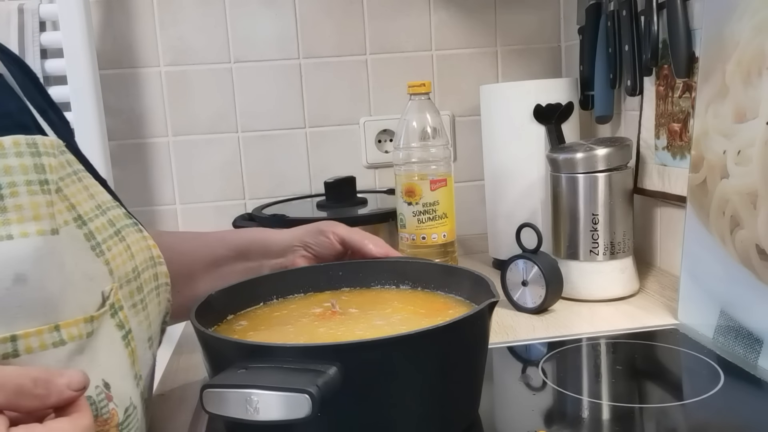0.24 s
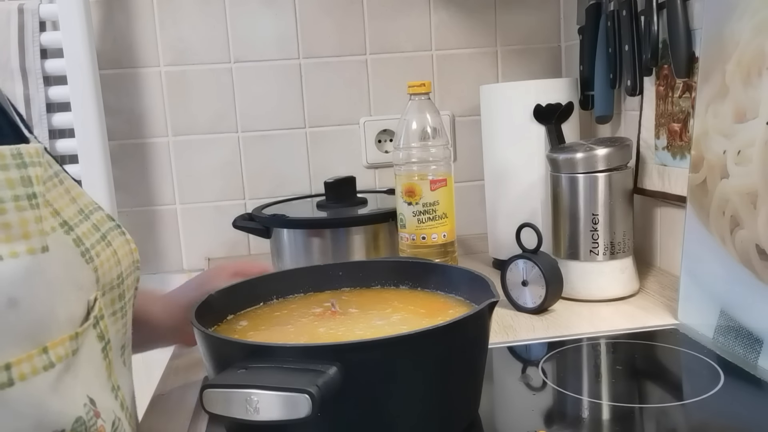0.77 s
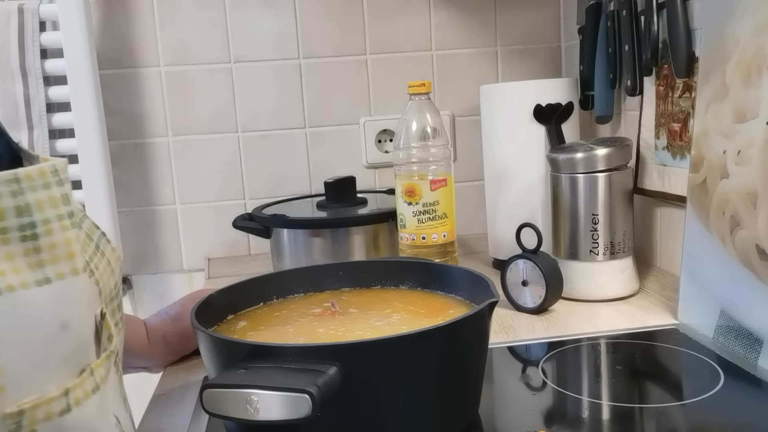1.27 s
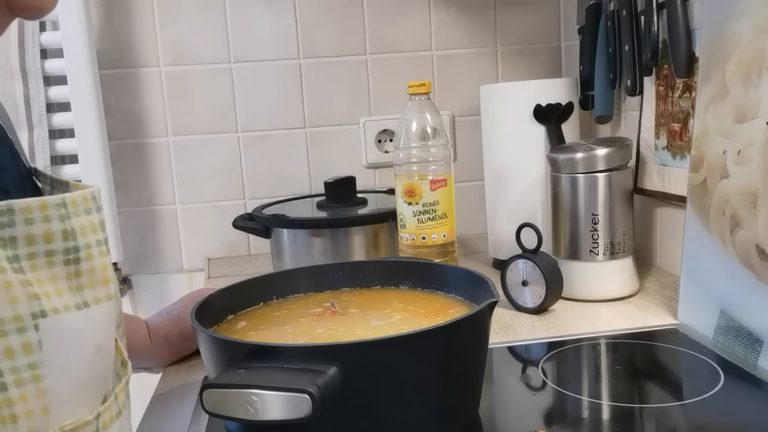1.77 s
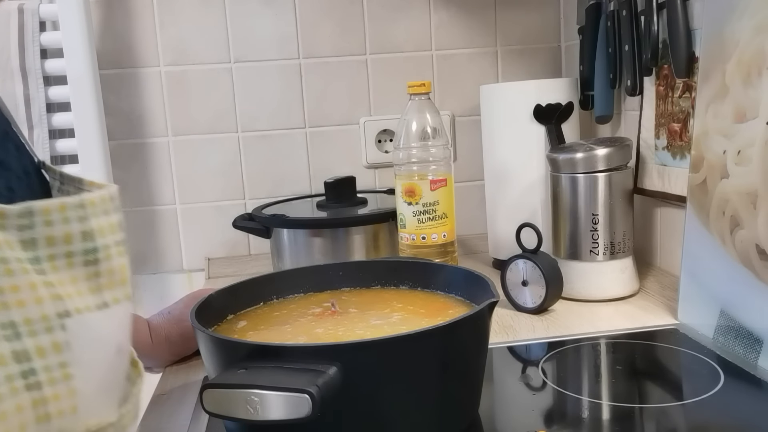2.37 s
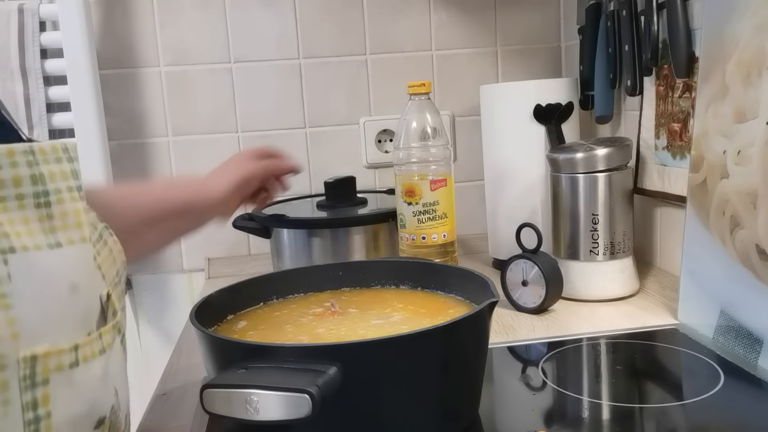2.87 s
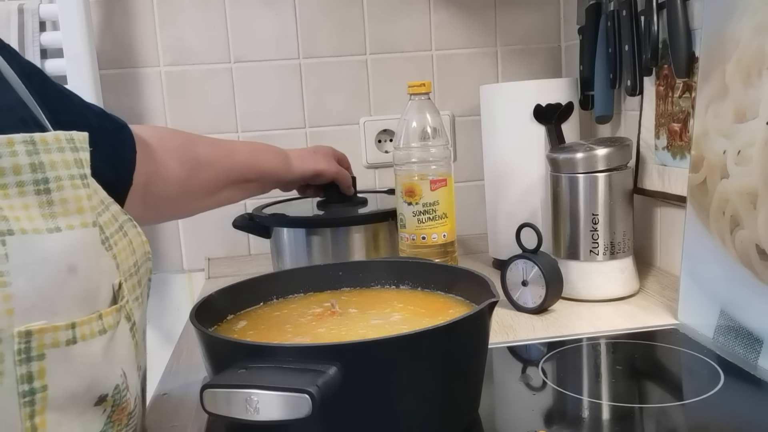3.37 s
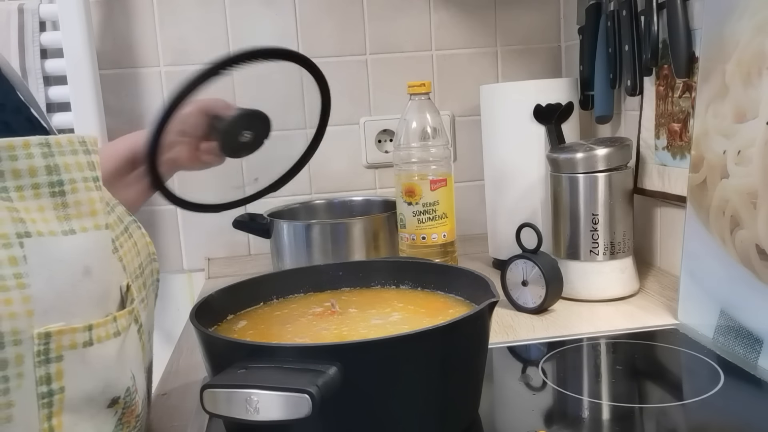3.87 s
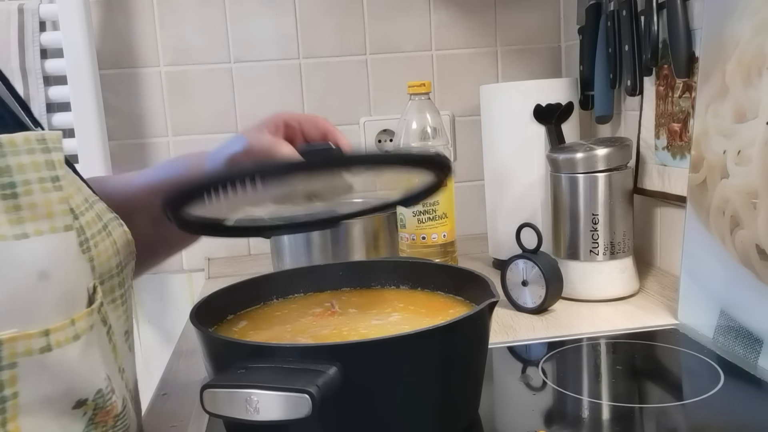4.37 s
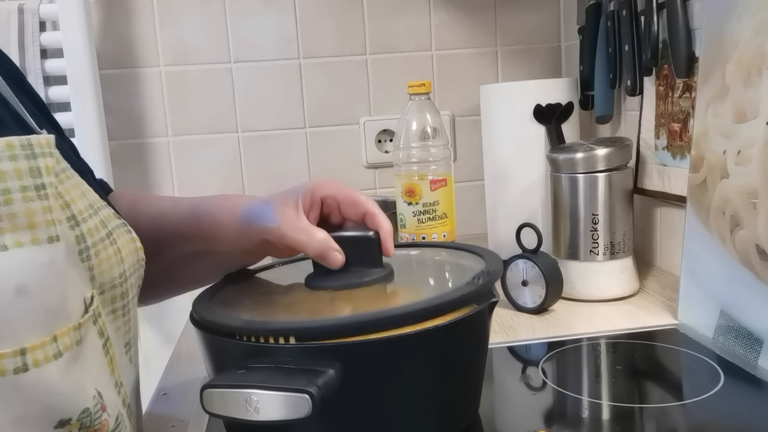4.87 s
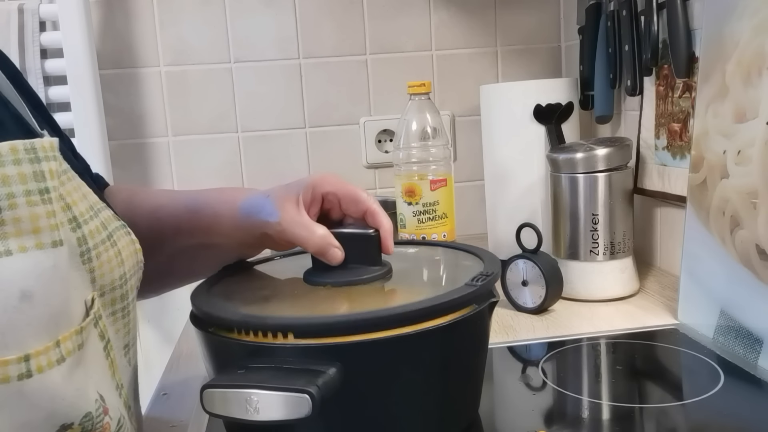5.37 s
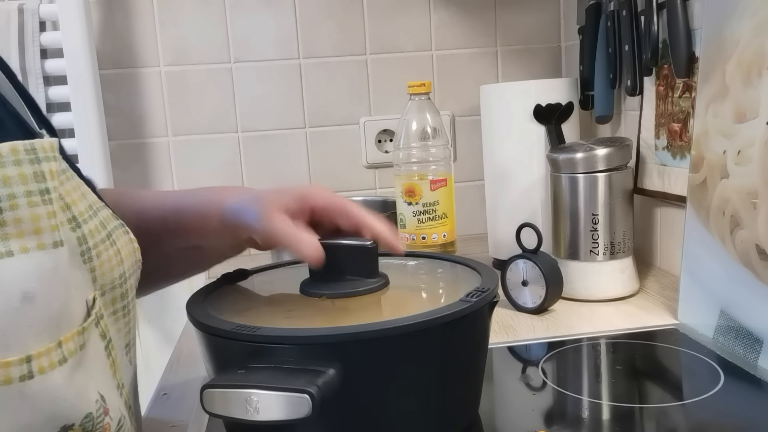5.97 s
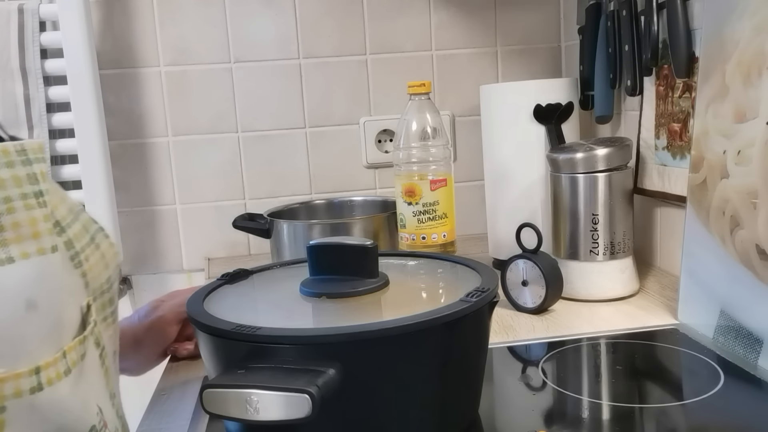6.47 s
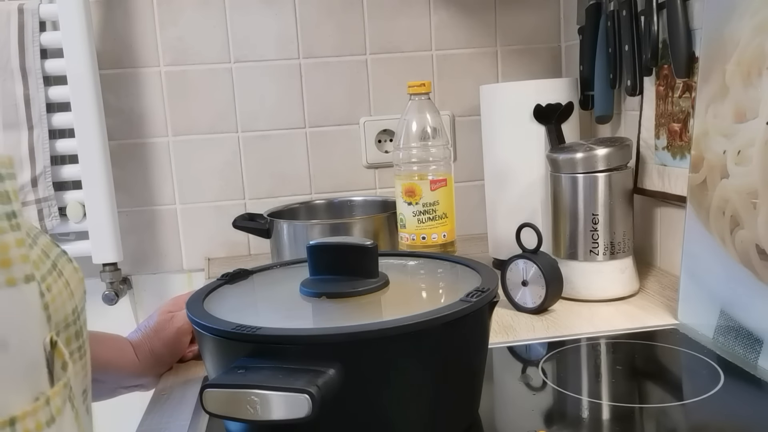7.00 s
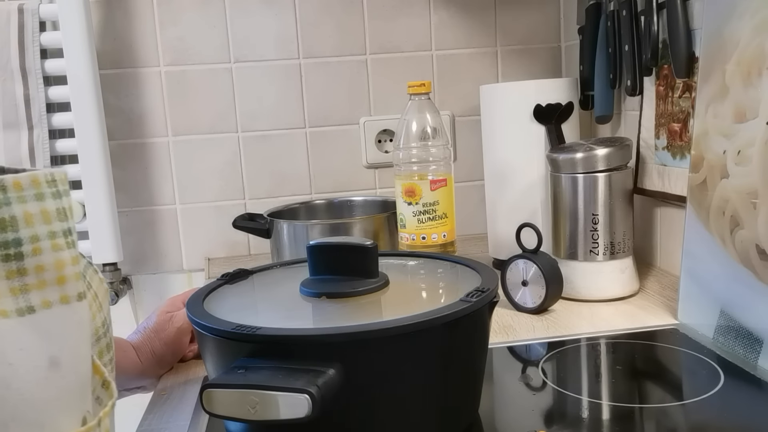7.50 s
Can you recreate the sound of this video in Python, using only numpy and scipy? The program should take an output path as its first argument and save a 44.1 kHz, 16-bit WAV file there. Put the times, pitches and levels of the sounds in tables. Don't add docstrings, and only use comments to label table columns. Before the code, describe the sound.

Quick, bright clockwork ticking in a tiled kitchen, with a short juddering lid scrape, then soft low knocks and a dull thump as a pot closes.

```python
import sys
import numpy as np
from scipy import signal
from scipy.fft import rfft, irfft
from scipy.io import wavfile
from scipy.ndimage import uniform_filter1d

SR = 44100
rng = np.random.default_rng(int(sys.argv[2]) if len(sys.argv) > 2 else 0)


def attenuation_scalar(level_db):
    decades = np.asarray(level_db, float) / 20
    return 10 ** decades


def file_out(sig):
    cols = np.atleast_2d(sig).T
    lim = np.clip(cols, -1, 1)
    pcm = np.round(lim * 32767).astype(np.int16)
    wavfile.write(sys.argv[1], SR, pcm)


N = 341334

# (middle [s], half length [s], level [dB])
SWELLS = [(0.035, 0.16, -54.5), (0.242, 0.062, -48), (1.05, 0.17, -52), (1.298, 0.054, -51.5),
          (1.727, 0.066, -48.5), (2, 0.16, -52), (2.288, 0.032, -50), (2.477, 0.023, -48.5),
          (2.747, 0.2, -58), (3.296, 0.024, -48), (3.543, 0.15, -50.5), (3.76, 0.044, -50),
          (4.008, 0.071, -49), (4.407, 0.16, -50.5), (4.595, 0.038, -56), (5.022, 0.05, -50.5),
          (5.31, 0.063, -48.5), (5.718, 0.087, -39.5), (6.325, 0.18, -56.5), (6.563, 0.1, -51.5),
          (6.96, 0.052, -47), (7.306, 0.11, -54), (7.54, 0.024, -48), (7.7, 0.046, -52)]
STILL_DB = -56


def evened(x):
    return x / np.sqrt(np.mean(x ** 2) + 1e-20)


def read(points, hz):
    f, value = np.transpose(points)
    return np.interp(np.log(hz + 1), np.log(f + 1), value)


def add(mix, s, sound):
    part = mix[..., round(s * SR):][..., :sound.shape[-1]]
    part += sound[..., :part.shape[-1]]


def resonate(x, hz, width):
    r = np.exp(-np.pi * width / SR)
    if np.isscalar(hz):
        return 2 * signal.lfilter([1 - r], [1, -r * np.exp(2j * np.pi * hz / SR)], x + 0j).real
    turn = np.exp(2j * np.pi * np.cumsum(hz) / SR)
    return 2 * (turn * signal.lfilter([1 - r], [1, -r], x / turn)).real


def resonate_twice(x, hz, width):
    return resonate(resonate(x, hz, width), hz, width)


def humps(t, rest_db, events):
    power = attenuation_scalar(rest_db) ** 2
    power = power + sum(attenuation_scalar(db) ** 2 * np.exp(-((t - s) / half) ** 2) for s, half, db in events)
    return 10 * np.log10(power)


def shape(points, hz, lo_hz, hi_hz):
    gain = attenuation_scalar(read(points, hz))
    inside = (hz > lo_hz) * (hz < hi_hz)
    return gain / np.sqrt(np.sum(gain ** 2 * inside) / len(hz))


def field(gain, size, patchy_db):
    # (pitch [Hz], likeness [-1 to 1])
    likeness = [(60, 0.82), (130, 1), (290, 0.51), (640, 0.45), (1410, -0.047), (7500, 0.044),
                (9000, 0.0037), (11000, 0.07)]
    # (pitch [Hz], left minus right [dB])
    balance = [(60, -2), (130, -3.5), (290, -2), (640, 2.5), (1410, 1), (3100, 2.5), (6820, 2.5),
               (15000, 9)]
    frames, hz = 4 * N // size + 5, np.fft.rfftfreq(size, 1 / SR)[:, None]
    a, b, c, d, patches = rng.standard_normal((frames, len(hz), 5)).T
    patches = uniform_filter1d(patches, size=5, axis=0)
    patches = evened(uniform_filter1d(patches, size=9, axis=1))
    same = np.clip(read(likeness, hz), -1, 1)
    left = a + 1j * b
    right = same * left + np.sqrt(1 - same ** 2) * (c + 1j * d)
    z = np.array([left, right])
    z *= attenuation_scalar(np.array([.5, -.5])[:, None, None] * read(balance, hz) + patchy_db * patches)
    z *= gain(hz, np.arange(frames) * size / 4 / SR) / np.sqrt(size)
    return signal.istft(z, nperseg=size, noverlap=3 * size // 4)[1][:, :N]


def room():
    # (pitch [Hz], level [dB per Hz])
    room_tone = [(15, -37), (25, -17), (48, -8.5), (71, -21), (108, 3.5), (140, -4), (185, -4.5),
                 (209, -15), (276, -16), (377, -31.5), (405, -25), (647, -28), (885, -32), (1130, -45),
                 (1600, -41), (2080, -70), (3520, -120)]
    # (middle [s], half length [s], level [dB])
    wafts = [
        (0.07, 0.04, -68.5),
        (1.065, 0.044, -62.5),
        (1.878, 0.049, -61.5),
        (2.187, 0.092, -67),
        (2.8, 0.21, -72),
        (4.53, 0.25, -69.5),
        (5.506, 0.24, -70),
    ]

    def gain(hz, t):
        stir_db = humps(t, STILL_DB, SWELLS)
        deep = 1 / (1 + (hz / 72) ** 12)
        high = 1 / (1 + (260 / (hz + 1)) ** 6)
        drone = shape(room_tone, hz, 35, 70) * attenuation_scalar(-69.5)
        rumble = shape(room_tone, hz, 80, 210) * attenuation_scalar(stir_db - 2.5)
        air_db = humps(t, -69, wafts) + 0.13 * (stir_db - STILL_DB) + 2.0
        air = shape(room_tone, hz, 300, 1000) * attenuation_scalar(air_db)
        return deep * drone + (1 - deep) * ((1 - high) * rumble + high * air)
    return field(gain, size=2048, patchy_db=3.5)


def boom():
    ring = resonate_twice(rng.standard_normal(N), 104.1, 21.2)
    steadier = np.sqrt(uniform_filter1d(ring ** 2, size=2600) + 0.66 * np.mean(ring ** 2))
    ring = evened(ring / steadier)
    return ring * attenuation_scalar(humps(np.arange(N) / SR, STILL_DB, SWELLS) - 4 + np.array([[-.7], [.7]]))


def hum():
    # (pitch [Hz], width [Hz], level
    # [dB])
    hum_tones = [(50, 10, -59), (277.4, 30.7, -74.5), (401.9, 11, -84.5), (696, 7.2, -84.5),
                 (881.3, 61, -80.5), (178, 16.7, -69.5), (600, 30, -85.5)]
    t, noise = np.arange(N) / SR, rng.standard_normal((len(hum_tones), N))
    tones = [evened(resonate_twice(n, hz, width)) for n, (hz, width, _) in zip(noise, hum_tones)]
    tones[0] = 0.51 * tones[0] + np.sin(2 * np.pi * hum_tones[0][0] * t)
    tones[0] = tones[0] * attenuation_scalar(-5.0 * np.exp(-((t - 2.7) / 0.61) ** 2))
    tones[1] = tones[1] * attenuation_scalar(np.interp(t, [5.8, 6.9], [0, 6.0]))
    return sum(attenuation_scalar(db) * tone for tone, (*_, db) in zip(tones, hum_tones))


def whine():
    # (pitch [Hz], level [dB])
    lines = [(8775, -93), (8976, -92), (9076, -85), (9125, -87), (9717, -92)]
    noise = rng.standard_normal((len(lines), 2, N))
    width_hz = 3.2
    return sum(attenuation_scalar(db - 4.5) * evened(resonate_twice(n, hz, width_hz)) for n, (hz, db) in zip(noise, lines))


def groans():
    # (middle [s], half length [s], level [dB], pitch [Hz])
    moves = [(0.751, 0.15, -67, 227), (1.11, 0.035, -65, 178), (1.503, 0.086, -66, 232),
             (1.95, .08, -62, 182.6), (2.15, 0.047, -61, 179), (2.397, 0.23, -77.5, 429),
             (2.75, 0.098, -68, 175), (3.99, 0.037, -59.5, 177.6), (4.47, 0.083, -61.5, 180),
             (5.151, 0.058, -64, 283), (5.55, 0.024, -47, 182.6), (6.032, 0.11, -66, 280),
             (6.903, 0.061, -65, 294), (7.097, 0.091, -69.5, 306), (7.4, 0.17, -60, 179),
             (7.402, 0.12, -68, 252), (7.652, 0.073, -66, 296), (0.049, 0.06, -72, 608),
             (3.472, 0.014, -55.5, 526), (3.516, 0.013, -58, 430), (3.548, 0.018, -60, 418),
             (3.596, 0.0083, -69, 872), (1.855, 0.032, -63.5, 412), (7.315, 0.045, -85, 1320)]
    out, u = np.zeros((2, N)), np.arange(-12000, 12000) / SR
    for (s, half, db, hz), noise in zip(moves, rng.standard_normal((len(moves), 2, len(u)))):
        tone = evened(resonate_twice(noise[0] + 0.42 * noise, hz, 0.15 * hz))
        swell = attenuation_scalar(db) * tone * np.exp(-.5 * (u / half) ** 2)
        add(out, max(s + u[0], 0), swell[:, u >= -s])
    return out


def beats():
    # (time [s], click [dB], body ring [dB], bright ring [dB])
    ticks = [(0.091, -56.5, -13, -1), (0.516, -53.5, -20, -8), (0.943, -55.5, -14, -4.5),
             (1.368, -57, -16, 1), (1.7947, -53, -6.5, -10), (2.224, -51, -11, -8.5),
             (2.6506, -54.5, -8.5, -7), (3.079, -54, -6.5, -2.5), (3.51, -53.5, -8, 4),
             (3.9396, -55, -8.5, -3.5), (4.37, -56, -4, -6), (4.804, -55.5, -6, -3), (5.233, -54, -5.5, -5),
             (5.664, -52.5, -6, -0.5), (6.096, -56.5, -11, -5), (6.526, -53.5, -13, -4.5),
             (6.957, -47, -24, -2.5), (7.3874, -55, -3.5, -2)]
    # (time [s], click [dB], body ring [dB], bright ring [dB])
    tocks = [(0.295, -53, -24, -9), (0.721, -57, -17, -0.5), (1.147, -48, -23, -13), (1.5746, -51, -24, -4),
             (2, -51, -20, -9), (2.428, -51, -23, -9), (2.857, -49, -23, -11), (3.288, -50.5, -22.5, -11),
             (3.718, -48.5, -23, -10.5), (4.15, -54, -16, -5), (4.581, -60, -17, -1), (5.013, -52, -18, -8),
             (5.443, -51, -22, -8), (5.8734, -50, -19.5, -4.5), (6.3048, -56.5, -12, 0),
             (6.7338, -53.5, -21, -1.5), (7.166, -52, -23, -1), (7.595, -45, -25.5, -12.5)]
    # (plate [dB], wheels [dB], spring [dB], pin [dB])
    colours = [(-15.0, -15, -9, -10), (-28.0, -25, -9, -10), (-14, -19, -20, -12), (-14.5, -9.5, -15, -11),
               (-12.5, -17, -11.5, -5.0), (-32.0, -29, -15.5, -12), (-18, -17.0, -13, -9.0),
               (-32.0, -18, -6, -8), (-11.5, -12.0, -9.5, -12.0), (-26.0, -29, -14, -17),
               (-14.5, -19.0, -17, -18), (-15.5, -20.0, -14.5, -16), (-8.5, -15, -12, -7),
               (-22, -33, -14, -12), (-14, -17, -12, -13.0), (-26, -22, -16.5, -12), (-9, -8.5, -7, -5),
               (-24.0, -25, -14, -11), (-17, -12, -13, -13), (-20, -14, -9.5, -18), (-5.5, -13.5, -12, -8),
               (-15, -12.0, -2.5, -2), (-21, -18, -12.5, -14), (-26.0, -23, -10.5, -20),
               (-12.5, -16, -12.0, -13), (-29, -22, -10.5, -13), (-10, -12, -12, -19),
               (-25.0, -22, -6, -10.0), (-13, -16, -9, -12), (-15, -12, -5.5, -6), (-7, -19, -9, -7),
               (-30, -16.0, -9.5, -13), (-12.5, -22, -14.5, -12), (-29, -18, -6.5, -10),
               (-6.5, -22, -6.5, -2.5), (-25, -25, -20.5, -27)]
    rows = [row for pair in zip(ticks, tocks) for row in pair]
    return [(s, db, case, *colour, top) for (s, db, case, top), colour in zip(rows, colours)]


def hiss_and_echo():
    # (pitch [Hz], level [dB per Hz])
    hiss_tone = [(530, -19.5), (900, -7.5), (979, -14.5), (1100, -3), (1390, -8.5), (3960, -20.5),
                 (5610, -14), (6890, -22), (7680, -21), (8760, -8.5), (9090, -2.5), (9650, -9.5),
                 (10800, -18.5), (15100, -20), (16000, -14.5)]
    # (pitch [Hz], level [dB per Hz])
    echo_tone = [(760, -67), (1300, -14), (1860, -12), (2420, -16.5), (2980, -14), (3280, -20),
                 (5600, -10.5), (7050, -22.5), (7920, -20), (8610, -3.5), (8980, 2), (10700, -11.5),
                 (14900, -12.5), (16000, -43)]
    # (pitch [Hz], fade time [s])
    echo_fade = [(1500, 0.36), (5000, 0.41), (9000, 0.44), (15000, 0.24)]
    # (pitch [Hz], width [Hz], level [dB])
    echo_rings = [(11680, 350, 7.5), (8570, 290, 3), (13500, 760, 7)]
    # (middle [s], half length [s], level [dB])
    rustles = [(0.222, 0.066, -71), (0.703, 0.19, -75), (0.946, 0.16, -67), (1.196, 0.058, -62),
               (1.433, 0.063, -59), (1.644, 0.085, -62), (1.998, 0.15, -70.5), (2.235, 0.07, -68.5),
               (2.783, 0.24, -66.5), (3.5, 0.04, -64), (3.715, 0.018, -66), (3.98, 0.063, -69.5),
               (4.21, 0.037, -67), (4.527, .15, -69.5), (5.087, 0.061, -66.5), (5.671, 0.015, -55.5),
               (6.116, 0.21, -71.5), (6.558, 0.73, -70), (6.818, 0.065, -63.5), (7.002, 0.1, -60),
               (7.253, 0.077, -68), (7.61, 0.03, -65), (7.677, 0.054, -77)]

    def gain(hz, t):
        hiss = shape(hiss_tone, hz, 1000, 21200) * attenuation_scalar(-70.5)
        cloth = shape(echo_tone, hz, 8000, 16000) * attenuation_scalar(humps(t, -91, rustles) - 3.0)
        power = hiss ** 2 + cloth ** 2
        rings = attenuation_scalar(sum(d / (1 + (2 * (hz - f) / w) ** 2) for f, w, d in echo_rings))
        walls = shape(echo_tone, hz, 7800, 9140) * rings
        for when, db, case_db, plate_db, wheels_db, spring_db, pin_db, top_db in beats():
            age = t - when - .008
            colour = [(1700, case_db + 18.0), (2500, plate_db + 16.5), (3700, wheels_db + 18.0),
                      (5600, spring_db + 11.5), (9000, 0.0061), (10500, 0.1),
                      (11800, pin_db + 12.5), (13000, top_db + 6)]
            fade_db = db + 0.75 * read(colour, hz) - 12 - 60 * np.abs(age) / read(echo_fade, hz)
            power = power + (walls * attenuation_scalar(fade_db) * (age > 0)) ** 2
        return np.sqrt(power)
    return field(gain, size=256, patchy_db=0.93)


def timer():
    # (delay [s], level [dB])
    blow_sets = [
        [(-.022, -11), (0, 4), (.0035, -3.5), (.0065, -8.5)],
        [(-.022, -15), (0, -1.5), (.003, -13), (.006, -22)],
    ]
    # (pitch [Hz], width [Hz], level [dB])
    case_rings = [(1640, 79, -8), (1714, 67, -4.5)]
    # (pitch [Hz], width [Hz], level [dB])
    plate_rings = [(2472, 57, 21), (2586, 110, 12)]
    # (pitch [Hz], width [Hz], level [dB])
    wheel_rings = [(2890, 160, -6.5), (3650, 110, -1.5), (3930, 700, -5), (4310, 150, 2)]
    # (pitch [Hz], width [Hz], level [dB])
    spring_rings = [(4960, 60, -2.5), (5180, 61, -7), (5625, 170, 2.5), (6300, 370, -8), (5680, 620, 4.5)]
    # (pitch [Hz], width [Hz], level [dB])
    pallet_rings = [(8840, 65, 8), (9100, 110, 7), (8620, 110, 2.5), (8880, 260, -1), (9670, 150, 0),
                    (9620, 80, 8.5), (10100, 230, 3)]
    # (pitch [Hz], width [Hz], level [dB])
    pin_rings = [(11800, 170, 9), (12060, 150, -6)]
    # (pitch [Hz], width [Hz], level [dB])
    top_rings = [(10740, 2360, 7), (12600, 270, 3), (13160, 300, 0), (13300, 280, 4), (14340, 600, 10.5),
                 (14950, 300, -4), (15250, 300, -4)]
    case_lead = [1610, 1570, 1690, 1750, 1630, 1670, 1710, 1630, 1580, 1530, 1640, 1660, 1750, 1640, 1730,
                 1890, 1630, 1670, 1590, 1650, 1630, 1590, 1680, 1710, 1790, 1790, 1640, 1780, 1580, 1580,
                 1580, 1750, 1570, 1610, 1660, 1660]
    pallet_lead = [9580, 8860, 9610, 8610, 8940, 8800, 8880, 9590, 8870, 8860, 9050, 9050, 8860, 8790, 9600,
                   8610, 9610, 9030, 8850, 8960, 9610, 9560, 8830, 8830, 9060, 8630, 9060, 9050, 8880, 8860,
                   9660, 8610, 9790, 9050, 8910, 8810]
    part_pan = [-11.5, 10.5, -8, 3, 1.8, 8, 6]
    part_same = [-0.46, -0.28, -0.47, 0.077, -0.31, -0.087, 0.094]
    unlock_levels = [2, -4, -1, -1.5, 0, -3, -5]
    detune, uneven_db = .008, 3

    out, t = np.zeros((2, N)), np.arange(3500) / SR
    rows = beats()
    chance = rng.standard_normal((len(rows), 2, len(t)))
    for k, (s, db, case, plate, wheels, spring, pin, top) in enumerate(rows):
        blows = []
        for lag, d in blow_sets[k % 2]:
            age = t - .0292 - lag
            blows.append(attenuation_scalar(d - 60 * abs(age) / 0.021) * np.clip(age / 0.001, 0, 1))
        case_now = case_rings + [(case_lead[k], 45, 1.5)]
        pallets_now = pallet_rings + [(pallet_lead[k], 114, 9.5)]
        parts = (case_now, plate_rings, wheel_rings, spring_rings, pallets_now, pin_rings, top_rings)
        levels = (case, plate, wheels, spring, 0, pin, top)
        for modes, part_db, pan_db, same, unlock_db in zip(parts, levels, part_pan, part_same, unlock_levels):
            left, other = (attenuation_scalar(unlock_db) * blows[0] + sum(blows[1:])) * chance[k]
            drive = np.array([left, same * left + np.sqrt(1 - same ** 2) * other])
            strongest = max(m[2] for m in modes)
            ring = 0
            for (hz, width, d), (a, b) in zip(modes, rng.standard_normal((len(modes), 2))):
                hz = hz * (1 + detune * b * (d < strongest))
                tone = resonate(resonate(drive, hz, 6 * width), hz, width)
                ring = ring + attenuation_scalar(d + uneven_db * a) * tone / np.sqrt(width)
            loudest = np.sqrt(uniform_filter1d(ring ** 2, size=200, axis=1).max(axis=1, keepdims=True))
            level = attenuation_scalar(db + part_db - 3.5 + np.array([[.5], [-.5]]) * pan_db)
            add(out, s - .03, level * ring / loudest)
    return out


def snaps():
    snap_times = [1.058, 1.395, 1.407, 1.412, 1.414, 1.414, 1.428, 1.84, 2.18, 2.75, 3.139, 3.16, 3.288,
                  3.441, 3.462, 3.47, 3.59, 4.34, 5.525, 5.668, 5.68, 5.685, 5.709, 5.715, 5.716, 5.745,
                  6.711, 6.814, 7.328, 7.4]
    # (level [dB], pitch [Hz], time to fade by 60 dB [s])
    snap_sounds = [(-65, 1270, 0.11), (-59, 540, 0.19), (-62, 1430, 0.14), (-58, 850, 0.056),
                   (-61.5, 11900, .28), (-60.5, 8830, 0.3), (-60, 840, 0.14), (-66, 670, 0.16),
                   (-59, 500, 0.15), (-56, 580, 0.14), (-70, 1480, 0.11), (-69, 1500, 0.14),
                   (-71, 1920, 0.044), (-57, 580, 0.081), (-80, 1600, 0.12), (-62, 730, .15),
                   (-64, 840, 0.065), (-54, 446, 0.19), (-57, 410, 0.37), (-63.5, 2950, 0.051),
                   (-60, 930, .07), (-70, 2100, .1), (-61.5, 840, .14), (-59, 2240, 0.06), (-64, 2850, .03),
                   (-53, 440, 0.1), (-58, 16000, .025), (-65, 15000, .025), (-53, 240, 0.21),
                   (-76, 1400, 0.18)]
    out, t = np.zeros((2, N)), np.arange(6000) / SR
    noises = rng.standard_normal((len(snap_sounds), 2, len(t)))
    for s, (db, hz, t60), noise in zip(snap_times, snap_sounds, noises):
        width = min(.6 * hz, 320) if t60 > .04 else hz / 4
        crack = evened(resonate_twice(noise + .5 * noise[0], hz, width))
        add(out, s, attenuation_scalar(db - 60 * t / t60) * crack * (1 - np.exp(-t * hz / 4)))
    return out


def thuds():
    # (pitch [Hz], level [dB], time to fade by 60 dB [s])
    counter_rings = [(65.6, -10, 0.23), (100.8, 5.5, 0.24), (121.3, 10.5, 0.14), (175.7, 2, 0.39),
                     (266.3, -14.5, 0.39), (387, -7.5, 0.12), (333, -11.5, 0.1), (508, -21, 0.091),
                     (770, -38, .1), (950, -30, 0.076)]
    # (time [s], level [dB], hardness [dB per octave], pitch factor [1], rise [s])
    landings = [(1.787, -48.5, -26.5, 0.9, 0.0043), (3.29, -39.5, -7, 1, 0.011),
                (3.352, -45, -7, 1.2, 0.011), (3.612, -42, -16, 0.97, 0.013),
                (4.981, -37.5, -3, 1.07, 0.017), (5.524, -30, -7, .88, 0.0065),
                (5.5441, -30, -4.5, .97, 0.0057), (5.639, -43, 8, 1.1, 0.0049),
                (5.672, -28, 2, 1.07, 0.0085), (5.485, -55, 2, 0.96, .005), (5.764, -29, 2, 1.03, 0.0038),
                (5.813, -39, 0, 1.23, 0.0056), (5.849, -38.5, 0.5, 1.06, 0.0027)]
    out, t = np.zeros((2, N)), np.arange(SR // 2) / SR
    for s, db, hard_db, pitch, rise in landings:
        ring = 0
        for hz, d, t60 in counter_rings:
            side = np.array([[0], [.45]]) * min(hz / 260, 1.6) ** 2
            level = attenuation_scalar(d + hard_db * np.log2(max(hz, 100) / 150) - 60 * t / t60)
            ring = ring - level * np.sin(2 * np.pi * hz * pitch * t + side)
        add(out, s - .0035, attenuation_scalar(db - 9.5) * ring * (1 - np.exp(-(t / max(rise, .001)) ** 2)))
    stiff = signal.butter(2, 82, "high", fs=SR, output="sos")
    return signal.sosfilt(stiff, out) * attenuation_scalar(np.array([[-1.1], [1.1]]))


def drag():
    # (middle [s], half length [s], judder [dB], judder pitch [Hz], rasp [dB])
    bouts = [
        (3.45, 0.011, -40.5, 183, -49.5),
        (3.475, 0.01, -35, 195, -43.5),
        (3.508, 0.012, -38.5, 172.7, -47),
        (3.552, 0.031, -46.5, 194.6, -54),
        (3.609, 0.024, -56, 168, -62),
    ]
    # (pitch [Hz], width [Hz], level [dB])
    pot_rings = [(260, 37, 10), (412, 62, 2), (515, 40, -3), (700, 34, -9), (832, 24, -8.5)]
    s, half, judder_db, hz, rasp_db = np.transpose(bouts)
    t = np.arange(s[0] - .013, s[-1] + 0.073, 1 / SR)
    noise, out = rng.standard_normal((2, len(t))), np.zeros((2, N))
    turns = np.cumsum(np.interp(t, s, hz)) / SR
    judder_level = attenuation_scalar(humps(t, -74, zip(s, half, judder_db)) + np.array([[-1.5], [1.5]]))
    judder = np.sqrt(2) * np.sin(2 * np.pi * turns) * judder_level
    slips = (noise[0] + noise) * (1.1 + np.exp(-(turns % 1) / 0.19))
    rasp = evened(sum(attenuation_scalar(d) * resonate(resonate(slips, f, w), f, 2 * w) for f, w, d in pot_rings))
    rasp = rasp * attenuation_scalar(humps(t, -68, zip(s, half, rasp_db)) - 2.0)
    add(out, t[0], (judder + rasp) * signal.windows.tukey(len(t), .04))
    return out


def lid_air():
    # (time [s], pitch [Hz], level [dB])
    gap = [(4.55, 705, -86), (4.8, 700, -69), (4.9, 660, -75), (4.93, 610, -61.5), (4.975, 487, -63.5),
           (5.05, 484, -58.5), (5.14, 500, -57.5), (5.185, 517, -71), (5.3, 590, -66.5), (5.45, 600, -69),
           (5.5, 590, -80)]
    # (time [s], pitch [Hz], level [dB])
    gap_upper = [(4.55, 1240, -96), (4.75, 1210, -80), (4.85, 1180, -87), (5.0, 1050, -88),
                 (5.18, 1070, -76), (5.3, 1140, -92), (5.4, 1185, -82), (5.5, 1150, -105)]
    out = np.zeros(N)
    for s, hz, db in (np.transpose(gap), np.transpose(gap_upper)):
        t = np.arange(s[0], s[-1], 1 / SR)
        glide = np.interp(t, s, hz)
        pocket = resonate(resonate(rng.standard_normal(len(t)), glide, 72), glide, 80)
        pocket /= np.sqrt(uniform_filter1d(pocket ** 2, size=20000))
        add(out, s[0], pocket * attenuation_scalar(np.interp(t, s, db)) * signal.windows.tukey(len(t), .1))
    return out


def seating():
    # (pitch [Hz], level [dB], time to fade by 60 dB [s], first direction [-1 to 1])
    full_pot = [(65, -30, 0.19, 0.75), (100.6, -18, 0.15, 0.59), (127, -18, 0.13, -0.87),
                (178, -18.5, 0.2, 0.95), (270, -30, 0.15, 0.9), (329, -46.5, 0.12, 0.71),
                (388, -33.5, 0.15, 1), (500, -44, 0.13, 0.87), (627, -55.5, 0.072, 0.96),
                (774, -57, .08, 0.95), (970, -52, 0.098, 0.97)]
    seat_s, rise_s, bounce_s, bounce_db = 5.707, 0.0023, .019, -6.5
    out, t = np.zeros((2, N)), np.arange(SR // 2) / SR
    ring = 0
    for hz, db, t60, way in full_pot:
        side = np.array([[-.2], [.2]]) * min(hz / 260, 1.6) ** 2
        ring = ring - way * attenuation_scalar(db - 60 * t / t60) * np.sin(2 * np.pi * hz * t + side)
    add(out, seat_s, ring * (1 - np.exp(-(t / rise_s) ** 2)) * attenuation_scalar(np.array([[-1.1], [1.1]])))
    thump = out[:, round(seat_s * SR):][:, :len(t)].copy()
    add(out, seat_s + bounce_s, attenuation_scalar(bounce_db) * thump)
    return out


def scene():
    background = room() + boom() + hum() + whine() + hiss_and_echo()
    return background + groans() + timer() + snaps() + thuds() + drag() + lid_air() + seating()


def top_cut(x):
    return signal.sosfilt(signal.butter(12, 16450, fs=SR, output="sos"), x)


def record(dry):
    low_cut = signal.butter(4, 34.4, "high", fs=SR, output="sos")
    mix = signal.sosfilt(low_cut, dry)
    mix = mix * np.minimum(np.arange(N)[::-1] / 150, 1)
    hz = np.fft.rfftfreq(N, 1 / SR)
    top_edge = np.where(hz < 15780, 1, attenuation_scalar(-30) * (hz < 16450))
    mix = irfft(rfft(mix) * top_edge, N)
    return top_cut(mix)


dry = scene()
out = record(dry)
file_out(out)
```